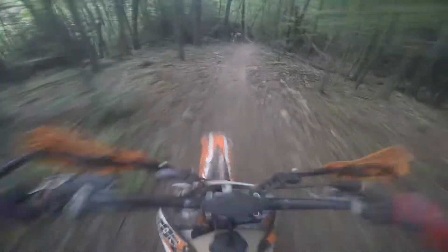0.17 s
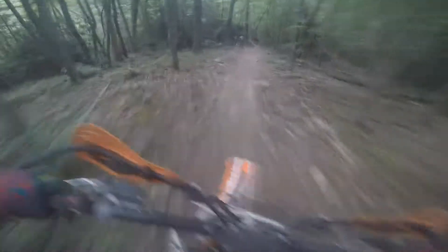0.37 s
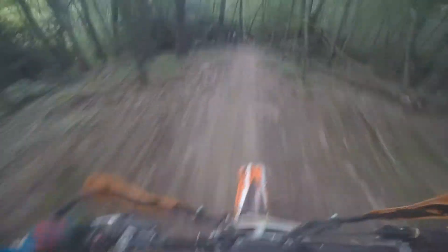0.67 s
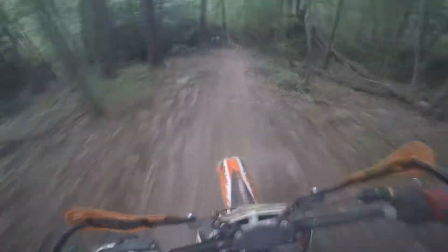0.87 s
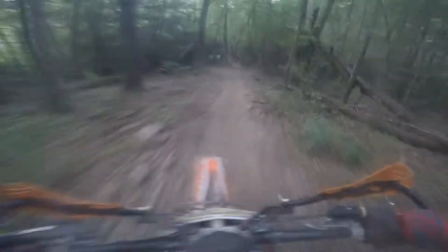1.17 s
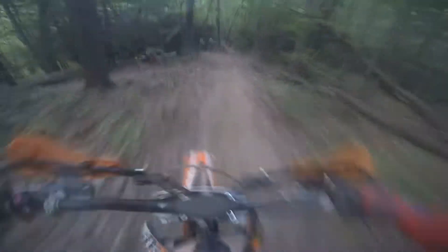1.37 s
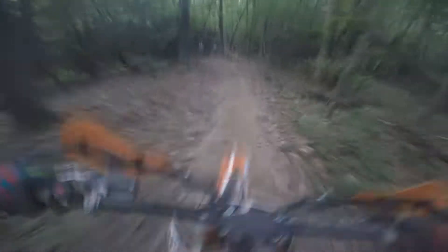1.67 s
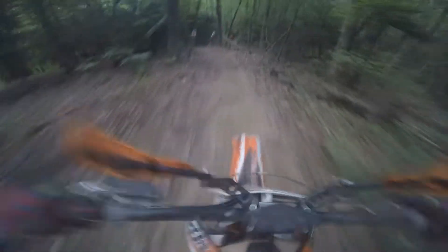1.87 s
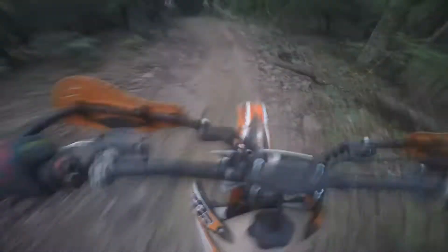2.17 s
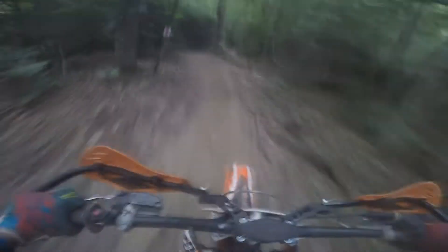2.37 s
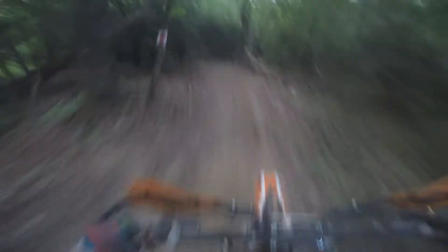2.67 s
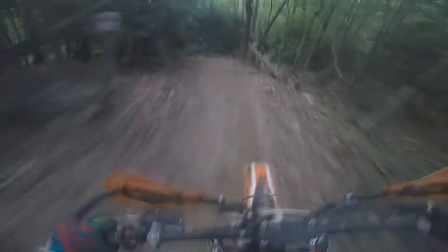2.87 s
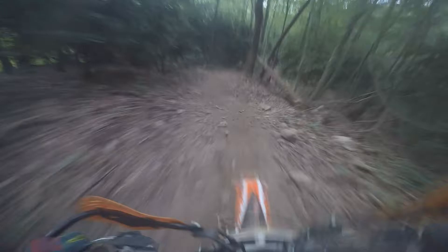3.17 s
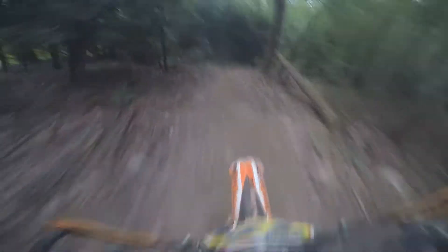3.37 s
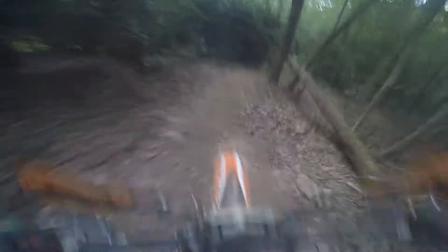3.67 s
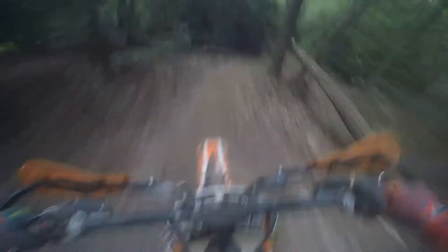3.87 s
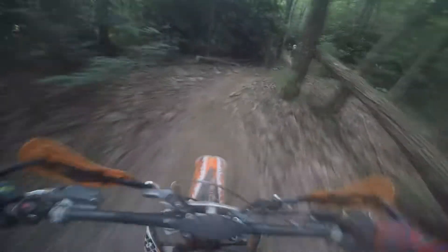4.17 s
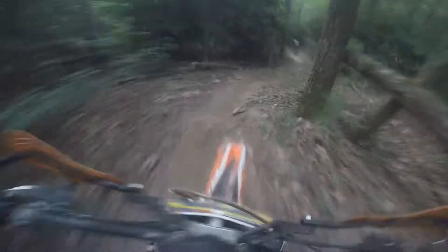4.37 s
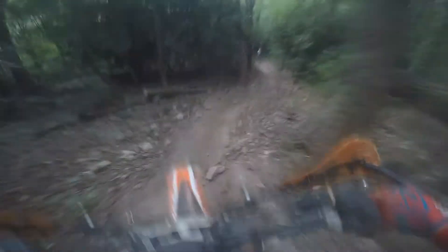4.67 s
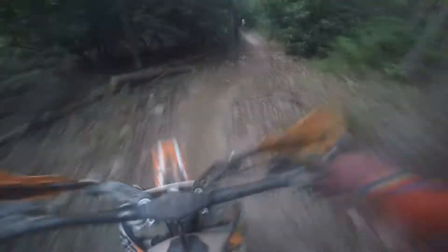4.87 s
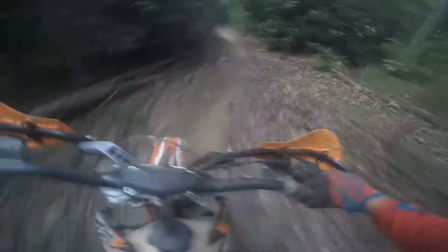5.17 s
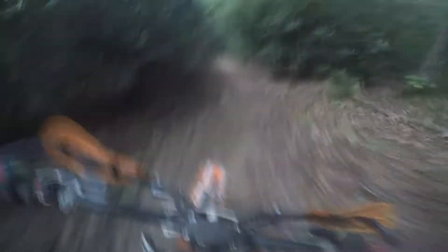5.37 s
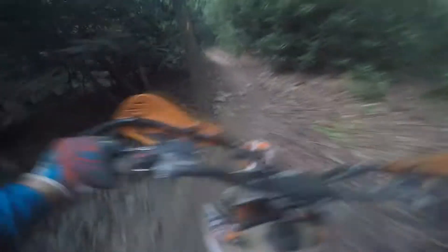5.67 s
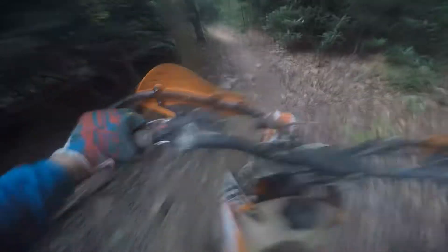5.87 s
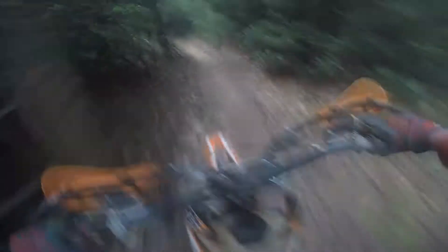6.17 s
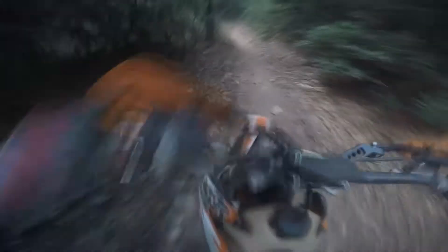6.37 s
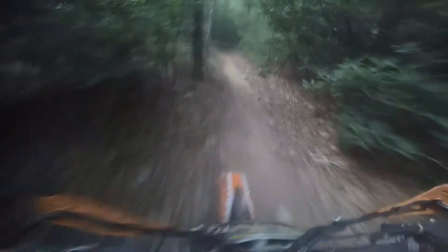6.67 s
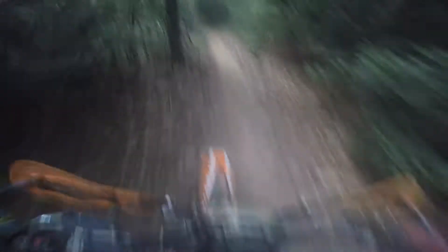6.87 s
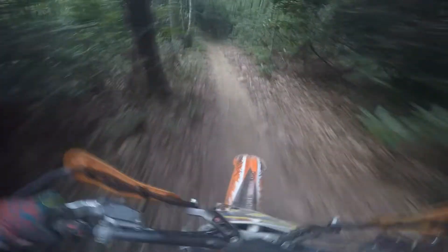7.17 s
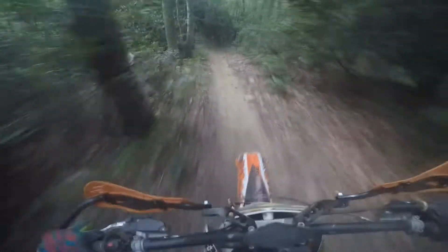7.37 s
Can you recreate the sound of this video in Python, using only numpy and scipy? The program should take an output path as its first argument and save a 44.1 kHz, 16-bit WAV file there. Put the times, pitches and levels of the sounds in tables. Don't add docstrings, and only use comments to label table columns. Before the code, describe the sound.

Close, muffled sound from a sealed helmet camera on a small dirt bike descending a forest trail. Roots and ruts make deep, ringing thumps while chain, buckle and stones rattle sharply. Engine clatter runs underneath; a short blip comes early, then a longer pull of quickening pops humming down. After one huge overloaded knock the engine nearly disappears, then blips again and settles.

```python
import sys
import numpy as np
from scipy import signal
from scipy.fft import rfft, irfft
from scipy.io import wavfile
from scipy.ndimage import uniform_filter1d

SR = 44100
rng = np.random.default_rng(int(sys.argv[2]) if len(sys.argv) > 2 else 0)


def output_pcm(signal):
    pcm = np.clip(np.atleast_2d(signal).T, -1, 1) * 32767
    wavfile.write(sys.argv[1], SR, np.round(pcm).astype(np.int16))


def decibels_to_gain(level_db):
    exponent = np.asarray(level_db, float) / 20
    return 10 ** exponent


N = 332514
T = np.arange(N) / SR


def evened(x):
    return x / np.sqrt(np.mean(x ** 2) + 1e-20)


def curve(rows):
    s, *columns = np.transpose(rows)
    return [np.interp(T, s, c) for c in columns]


def add(mix, s, sound):
    part = mix[int(s * SR):][:len(sound)]
    part += sound[:len(part)]


def pushes(s, size):
    track = np.zeros(N)
    np.add.at(track, np.minimum((np.asarray(s) * SR).astype(int), N - 1), size)
    return track


def drift(width):
    return evened(uniform_filter1d(uniform_filter1d(rng.standard_normal(N), width), width))


def filtered(x, order, hz, kind):
    return signal.sosfilt(signal.butter(order, hz, kind, fs=SR, output="sos"), x)


def coloured(x, points, tilt_db=0.):
    hz = np.fft.rfftfreq(len(x), 1 / SR) + 1
    f, db = np.transpose(points)
    gain_db = np.interp(np.log(hz), np.log(f), db) + tilt_db * np.log2(hz / 3000)
    return irfft(rfft(x) * decibels_to_gain(gain_db), len(x))


def burst(t, t60, rise):
    return decibels_to_gain(-60 * t / t60) * (1 - np.exp(-t / rise))


def ping(t, hz, t60, rise):
    return np.sin(2 * np.pi * hz * t) * burst(t, t60, rise)


def rung(x, hz, t60, rise):
    return signal.oaconvolve(x, ping(T[:int(1.2 * t60 * SR)], hz, t60, rise))[:N]


def snap(t, colour, hz, ring_db, t60, tilt_db=0):
    noise = evened(coloured(rng.standard_normal(len(t)), colour, tilt_db))
    ring = filtered(noise, 1, [hz * 0.905, hz * 1.0], "band")
    return evened(noise + decibels_to_gain(ring_db) * evened(ring)) * burst(t, t60, .002)


# (f/Hz, t60/s, rise/s)
RING, SWAY = (54., 0.98, 0.0044), (39.46, 0.4, 0.0083)
# (t/s, ring level/dB, helmet sway level/dB)
ROOT_KICKS = [(0.012, -43, -10.5), (0.105, -13.5, -7.5), (0.128, -15, -38), (0.413, -24, -20),
              (0.76, -13, -9.5), (0.919, -20.5, -8), (1.012, -19.5, -16.5), (1.086, -27, -6.5),
              (1.177, -11.5, -10), (1.302, -45, -11), (1.448, -47, 0), (2.074, -19.5, -7),
              (2.453, -17.5, -11.5), (2.524, -21, -11), (2.72, -6, 0), (2.783, -24, -8.5),
              (3.06, -24.5, -12), (3.614, -35, -15.5), (4.589, -8.5, -4.5), (4.655, -30, -6),
              (4.995, -8, 0.5), (5.032, -51, -6), (5.423, -10.5, -16), (6.075, -9.5, -7.5),
              (6.273, -7, -45), (6.308, -33, -10.5), (6.455, -45, -8.5), (6.772, -21, -10),
              (6.834, -15, -9), (6.965, -7.5, -45)]
# (t/s, ring level/dB, helmet sway level/dB)
RUT_DROPS = [(0.274, -6, -6), (0.311, -44, -8), (0.971, -35, -9.5), (1.231, -50, -9.5), (1.423, -7, -1),
             (1.631, -36, -4), (1.668, -15, -6), (1.873, -23, -11), (1.982, -14.5, -12), (2.021, -41, -2),
             (2.131, -43, -8.5), (3.136, -17, -46), (3.514, -9, -13), (3.768, -17.5, -47), (3.918, -35, -5),
             (3.962, -26, -7), (4.031, -43, -2.5), (4.087, -15, -28), (4.159, -17, -26), (4.269, -22, -14),
             (4.709, -16, -5), (5.728, -23, -15), (5.812, -17.5, -12.5), (6.033, -57, -10),
             (6.222, -10, -43), (6.495, -11.5, -45), (6.515, -9, -15), (6.608, -20.5, -45),
             (6.722, -11, -11), (7.483, -43, -11.5)]
# (t/s, direction +1 up or -1 down, ring level/dB, sway level/dB)
NUDGES = [
    (0.817, 1, -26, -11),
    (0.866, -1, -42, -11),
    (1.745, -1, -19.5, -17),
    (2.202, -1, -47, -12.5),
    (2.288, -1, -21, -26),
    (4.869, -1, -47, -15.5),
    (7.017, -1, -29, -17),
    (7.092, 1, -22.5, -19),
]
# (t before start/s, level/dB)
EARLIER_JOLT = [
    (0.016, -20),
    (0.024, -27.5),
]


def mount():
    kicks = [(s, 1, *db) for s, *db in ROOT_KICKS]
    drops = [(s, -1, *db) for s, *db in RUT_DROPS]
    s, way, ring_db, sway_db = np.transpose(kicks + drops + NUDGES)
    ring = rung(pushes(s, np.sign(way) * decibels_to_gain(ring_db)), *RING)
    sway = rung(pushes(s, np.sign(way) * decibels_to_gain(sway_db)), *SWAY)
    left = sum(decibels_to_gain(db) * ping(T + lead, *mode) for (lead, db), mode in zip(EARLIER_JOLT, (RING, SWAY)))
    return left + ring - sway


# (t/s, level/dB, f/Hz, thud level in the case/dB)
KNOCKS = [(0.121, -4, 97.5, -33.5), (0.277, -9, 98, -36), (0.769, 4.5, 90.3, -39), (0.923, -6.5, 92, -34),
          (0.979, -6, 95.4, -31), (1.09, -6, 92.4, -42), (1.305, -5, 94, -36), (1.421, 0, 86, -27),
          (1.626, -8.5, 103, -32.5), (2.004, 0, 106.2, -27), (2.018, 8.5, 93, -25), (2.044, 0.5, 83, -29),
          (2.443, -6, 111, -66), (2.725, 5, 88.7, -22), (3.506, 3, 94.6, -41), (3.538, -7, 85, -35),
          (3.757, -7, 88.5, -50), (4.003, 5.5, 93.7, -45), (4.049, -2.5, 103, -45), (4.229, -7, 87.6, -38),
          (4.59, -3.5, 111, -26), (4.705, -5, 91, -46), (5.003, 9.5, 82, -16.5), (5.433, -1, 98.3, -36.5),
          (6.071, -1, 97, -29), (6.222, -10, 104, -28.5), (6.503, 2.5, 111, -49),
          (6.723, -7.5, 109.5, -36.5), (6.969, -2, 87.3, -37), (7.444, -7, 97.5, -30)]
# (t/s, level/dB, f/Hz)
TAPS = [(0.146, -15, 94), (0.421, -13, 108), (0.55, -12.5, 113), (0.592, -14, 121), (1.017, -15, 89),
        (1.168, -6, 97), (1.448, -5, 103), (1.671, -12, 90), (1.743, -15, 104), (1.846, -13, 104),
        (2.143, -14.5, 115), (2.234, -16.5, 112), (2.371, -17, 103), (2.429, -6, 77), (2.537, -11, 90.5),
        (2.863, -23, 119), (3.055, -12.5, 97), (3.139, -20, 83), (3.34, -23, 111), (3.909, -6.5, 96),
        (4.373, -9.5, 82), (4.649, -11, 101), (4.728, -7, 106), (4.845, -12.5, 110), (5.329, -38, 113),
        (5.613, -10.5, 88), (5.673, -13, 90), (5.831, -13, 103), (6.158, -12.5, 105), (6.286, -7.5, 114),
        (6.455, -10, 120), (6.543, -9.5, 109.6), (6.783, -11.5, 93), (7.072, -11.5, 89)]
# (t/s, peak level/dB, f/Hz)
STONE_CRACKS = [(0.424, -33, 2100), (1.434, -28, 574), (1.622, -28.5, 1210), (1.779, -23.5, 2100),
                (2.002, -24.5, 494), (2.027, -19.5, 580), (2.017, -21.5, 1170), (2.048, -29, 2870),
                (2.729, -30.5, 1110), (5.004, -26, 1040), (2.727, -22, 466), (3.115, -27.5, 2380),
                (3.344, -31, 535), (3.627, -36, 1770), (4.592, -25.5, 2200), (5.003, -19.5, 550),
                (5.003, -26, 1394), (5.013, -24, 5300), (5.079, -32.5, 2450), (5.318, -44, 676),
                (5.427, -34, 565), (5.607, -35, 1260), (5.611, -36.5, 2200), (6.075, -26.5, 1220),
                (6.224, -31.5, 1210), (6.225, -28, 2250), (6.555, -27.5, 1920), (6.848, -34, 574),
                (7.195, -40, 720), (7.314, -37, 644), (7.446, -34, 640)]
# (f/Hz, level/dB)
CRACK_COLOUR = [(100., -32), (300., 7), (600., -4), (1300., -2.5), (2500., -5), (8000., -36)]


def frame():
    thud_mode, thud_lag_s = (252.3, 0.075, 0.0035), 0.0031
    tap_thud_db = -29.5
    out, t = np.zeros(N), T[:8000]
    for s, db, hz, *_ in KNOCKS + TAPS:
        add(out, s, decibels_to_gain(db) * ping(t, hz, t60=0.11, rise=0.014))
    thuds = [(s, thud_db) for s, _, _, thud_db in KNOCKS] + [(s, db + tap_thud_db) for s, db, _ in TAPS]
    s, db = np.transpose(thuds)
    out += rung(pushes(s + thud_lag_s, decibels_to_gain(db + 6.0)), *thud_mode)
    for s, db, hz in STONE_CRACKS:
        grind = decibels_to_gain(2.5) * snap(t, CRACK_COLOUR, hz, -5, .045)
        note = decibels_to_gain(5) * ping(t, hz, .024, .001)
        add(out, s, decibels_to_gain(db - 3.) * (grind + note))
    return out


# (rms level/dB into ring, sway, nod, knock)
SHAKE_DB = [-41, -41, -36, -50]


def shake():
    nod, knock = (29.3, 0.82, 0.004), (116.5, 0.19, 0.016)
    bumps = (rng.random(N) < 70 / SR) * rng.uniform(-0.39, 1, N) * decibels_to_gain(0.56 * drift(3000))
    modes = (RING, SWAY, nod, knock)
    return sum(decibels_to_gain(db) * evened(rung(bumps, *mode)) for db, mode in zip(SHAKE_DB, modes))


# (f/Hz, level/dB)
RATTLE_COLOUR = [(350, -30), (600, -15.5), (1470, -9.5), (1830, -4.5), (3660, -7), (4090, -1.5), (5080, -4),
                 (5980, -7.5), (6850, -11.5), (7540, -17), (13700, -32.5), (15500, -31)]
# (t/s, peak level/dB)
CHAIN_SNAPS = [(0.8445, -30.5), (1.5773, -17.5), (1.6187, -23), (1.677, -24), (1.8327, -20), (1.9866, -27),
               (2.379, -29), (2.5611, -22.5), (3.037, -29.5), (3.1181, -20.5), (3.2415, -22.5),
               (3.461, -27), (3.623, -22), (3.8476, -38), (3.99, -29), (4.5272, -18.5), (4.5935, -30),
               (4.6328, -26), (4.7648, -19), (5.0107, -21.5), (6.224, -37.5), (6.3173, -26),
               (6.5056, -22.5), (6.5525, -25), (6.6005, -24), (7.4799, -24.5)]
# (t/s, peak level/dB)
BUCKLE_SNAPS = [(0.2715, -27), (0.4217, -21.5), (1.001, -22.5), (1.066, -23.5), (1.1324, -27), (1.429, -27),
                (1.7812, -17), (1.938, -28), (2.0144, -18.5), (2.1072, -22.5), (2.348, -25.5),
                (2.581, -18.5), (2.6652, -16), (3.176, -26), (3.3419, -23.5), (3.4009, -23), (5.14, -37),
                (5.167, -45), (5.322, -35.5), (5.338, -34), (5.55, -38), (5.585, -35), (5.8136, -26.5),
                (6.636, -28), (6.6937, -26), (6.732, -21.5), (6.9177, -24.5)]


def rattles():
    note_spread = 0.15
    spread_db = 3.
    out, t = np.zeros(N), T[:4096]
    for rows, note_hz in ((CHAIN_SNAPS, 3380), (BUCKLE_SNAPS, 3680)):
        for s, db in rows:
            lag, share, off, tilt = rng.uniform([.008, .3, -1.2, -.8], [.016, 1.1, 2.2, .5])
            hz = note_hz * (1 + note_spread * off)
            first = snap(t, RATTLE_COLOUR, hz, -7, .032, spread_db * tilt)
            rebound = snap(t, RATTLE_COLOUR, hz * rng.uniform(.8, 1.2), -7, .045, -spread_db)
            add(out, s, decibels_to_gain(db - 1.5) * first)
            add(out, s + lag, share * decibels_to_gain(db - 8) * rebound)
    return out


# (t/s, peak level/dB, sheen level/dB)
BRIGHT_TICKS = [(0.2713, -33, -27), (0.3112, -30, -27), (0.4224, -35, -25), (0.6563, -34, -19),
                (0.8599, -33, -25), (0.9547, -33, -22), (1.002, -34, -20), (1.068, -43, -27),
                (1.1333, -25, -29), (1.4287, -30, -20), (1.5787, -33, -19), (1.6177, -42, -25),
                (1.6581, -36, -26), (1.734, -25.5, -28), (1.7836, -33, -22), (1.8317, -36, -24),
                (1.85, -23, -26), (1.9874, -43, -14), (2.0136, -19, -28), (2.0692, -32, -21),
                (2.108, -32, -31), (2.288, -36, -22), (2.3275, -30, -28), (2.378, -38, -32),
                (2.56, -36, -13), (2.582, -20, -21), (2.6675, -22, -22), (2.933, -39, -17),
                (3.0365, -39, -23), (3.1175, -37, -18), (3.174, -28, -29), (3.239, -40, -24),
                (3.2545, -31, -27), (3.339, -26, -22), (3.3996, -28, -24), (3.463, -44, -16),
                (3.6227, -42, -22), (3.8312, -43, -20), (3.895, -36, -17), (3.9883, -38, -21),
                (4.0713, -30, -19), (4.5266, -34, -28), (4.5945, -44, -27), (4.775, -24, -24),
                (5.0115, -41, -26), (5.8117, -40, -24), (6.3195, -40, -28), (6.507, -37, -25),
                (6.6363, -35, -28), (6.6723, -27, -23), (6.6927, -38, -21), (6.7376, -33, -20),
                (6.8823, -39, -19), (6.9182, -37, -19), (6.9651, -33, -23), (6.998, -33, -29),
                (7.1387, -32, -16), (7.415, -32, -30), (7.4799, -39, -20), (7.5193, -39, -17)]


def ticks():
    out, t = np.zeros(N), T[:2048]
    fall = burst(t, 0.028, .0006)
    for s, db, sheen_db in BRIGHT_TICKS:
        low, high = rng.standard_normal((2, len(t)))
        dry_burst = evened(filtered(low, 2, [4800., 9000.], "band"))
        sheen = evened(filtered(high, 3, 9500., "high"))
        add(out, s, decibels_to_gain(db - 11.5) * fall * (dry_burst + decibels_to_gain(sheen_db + 5) * sheen))
    return out


# (t/s, peak level/dB)
FLICKS = [(0.066, -26), (0.1032, -43), (0.1426, -26.5), (0.181, -25), (0.2134, -33), (0.2344, -28),
          (0.2538, -25), (0.5122, -32), (0.617, -36), (0.6927, -28.5), (0.715, -30), (0.811, -30),
          (1.16, -23), (1.275, -35), (1.3678, -37), (1.398, -25.5), (1.5054, -29), (1.5504, -35),
          (1.592, -23), (2.2014, -33), (2.2735, -29), (2.4577, -31), (2.6024, -28), (2.6774, -20),
          (2.7174, -20.5), (2.9424, -27.5), (2.9614, -30.5), (3.1265, -21), (3.1535, -25), (3.3503, -21.5),
          (3.3802, -22), (3.4464, -43), (3.5199, -43), (3.5484, -29), (3.753, -30.5), (3.8317, -30),
          (3.894, -24.5), (3.9294, -26), (3.9459, -30), (4.0123, -22), (4.036, -25), (4.1114, -19),
          (4.3261, -29), (4.716, -28), (4.9671, -29), (6.1906, -29), (6.344, -26), (6.4757, -35),
          (6.5256, -32), (7.2414, -35), (7.3148, -32), (7.3913, -28)]


def flicks():
    out, t = np.zeros(N), T[:2048]
    for s, db in FLICKS:
        hz, tilt_db = rng.uniform(2500, 5500), rng.uniform(-1.5, 1.5)
        add(out, s, decibels_to_gain(db - 5.5) * snap(t, RATTLE_COLOUR, hz, -5, 0.041, tilt_db))
    return out


# (t/s, hum level/dB, time until gone/s)
SHUTS = [
    (4.11, -37.5, .9),
    (5.65, -53, .25),
    (6.59, -47, .85),
]
HUM_FLOOR_DB = -60


def overrun_db():
    level_db = HUM_FLOOR_DB
    for s, db, length_s in SHUTS:
        rise = np.clip((T - s) / .06, 0, 1)
        sink = np.clip(1 - ((T - s) / length_s) ** 2, 0, 1)
        level_db = level_db + (db - HUM_FLOOR_DB) * rise * sink
    return level_db


# (t/s, firing rate f/Hz, exhaust level/dB)
BLIPS = [
    [(2.16, 52, -52), (2.27, 52, -53)],
    [(6.3, 23, -49), (6.32, 20, -48)],
    [(3.727, 23, -53), (3.75, 20, -50)],
    [(6.368, 14, -49), (6.39, 20, -47)],
    [(2.42, 32, -58), (2.55, 57, -45.5), (2.68, 37, -64), (2.72, 56, -74)],
    [(3.762, 15.4, -36.5), (3.85, 32.5, -37.5), (3.93, 42, -43), (3.99, 63, -39), (4.03, 86, -41.5),
     (4.084, 98, -40), (4.11, 115, -42), (4.116, 42, -44), (4.15, 42, -39)],
    [(5.46, 32, -57), (5.52, 58, -51), (5.57, 58, -59)],
    [(6.425, 31, -41), (6.49, 39, -38), (6.53, 60, -43.5), (6.575, 107, -52), (6.61, 36, -52)],
]
# (t/s, level/dB)
ROAR_SWELL = [(0, 1), (.4, -0.5), (.9, 0.5), (1.5, 2), (2.2, 0), (2.6, -0.5), (2.95, -1), (3.3, 3),
              (3.7, 3.5), (4.2, 0), (4.6, 3.5), (4.9, 2), (5.3, 0.5), (5.7, 8), (6.1, 5), (6.5, 1),
              (7.1, 4), (7.54, -1.5)]


def roaring_db():
    settle_s = 0.25
    blows = pushes([row[0] for row in KNOCKS + TAPS], 0.38)
    shaken = signal.lfilter([1], [1, -np.exp(-1 / (settle_s * SR))], blows)
    open_throttle = sum(1. * (T > rows[0][0]) * (T < rows[-1][0]) for rows in BLIPS)
    load = uniform_filter1d(open_throttle, size=2000)
    loss_db = 0.56 * (overrun_db() - HUM_FLOOR_DB)
    return 2 + curve(ROAR_SWELL)[0] + 3 * np.tanh(shaken) + 2 * load - loss_db


def wandering(x, hz, width):
    turn = np.exp(2j * np.pi * np.cumsum(hz * (1 + 0.032 * drift(5000))) / SR)
    r, soft = np.exp(-np.pi * np.array([width, 400]) / SR)
    return (turn * signal.lfilter([1], np.convolve([1, -r], [1, -soft]), x / turn)).real


# (f/Hz, width/Hz, level/dB)
CASE_RINGS = [(1290, 90, -1), (1800, 100, -1), (2050, 120, -6), (2770, 130, 0), (3000, 130, 0),
              (4030, 220, -4), (5050, 260, -6)]


def case_rings(turns):
    grains = (rng.random((len(CASE_RINGS), N)) < 160 / SR) * rng.uniform(-1, 1, N)
    slap_db = -14 + 0.64 * (overrun_db() - HUM_FLOOR_DB) + 1.3 * rng.standard_normal(N)
    slap = np.diff(np.floor(turns), prepend=0) * decibels_to_gain(slap_db)
    lift = np.sqrt(1 + uniform_filter1d(slap ** 2, size=4000) / np.mean(grains ** 2))
    struck = (grains + slap) / lift
    rings = np.zeros(N)
    for x, (hz, width, db) in zip(struck, CASE_RINGS):
        rings += decibels_to_gain(db + 1.5 * drift(6000)) * evened(wandering(x, hz, width))
    return evened(rings)


# (t/s, clatter level/dB)
CLATTER = [(0, -39), (1.0, -38), (1.85, -37.5), (2.2, -41), (2.72, -36), (2.85, -44), (3.35, -41),
           (3.75, -41), (3.98, -34), (4.065, -25), (4.3, -30.5), (4.95, -36), (5.22, -49), (5.95, -43),
           (6.4, -37.5), (6.55, -34.5), (6.8, -36.5), (7.54, -38)]
# (f/Hz, level/dB)
CASE_COLOUR = [(88, 16), (150, -7), (225, -1.5), (263, -2.5), (453, -10), (550, -6.5), (877, -3),
               (1240, -7.5), (1870, -3), (2310, -6.5), (2980, -4.5), (3550, -8), (4060, -10.5), (5650, -19),
               (15500, -49)]


def clatter(turns):
    level_db = curve(CLATTER)[0]
    fizz_db = 0.26 * (level_db + 54.5)
    gate = 1 + 0.028 * np.cos(2 * np.pi * turns)
    strays = (rng.random(N) < 70 / SR) * decibels_to_gain(8.1 * np.minimum(rng.exponential(1, N), .9))
    strays = signal.oaconvolve(strays, burst(T[:2000], 0.056, 0.009))[:N]
    flicker = decibels_to_gain(2.06 * drift(250))
    metal = coloured(rng.standard_normal(N) * gate * (1 + 0.23 * strays) * flicker, CASE_COLOUR)
    roar = filtered(metal, 2, 850., "low")
    fizz = filtered(metal, 2, 4500., "high")
    body = metal + (decibels_to_gain(roaring_db()) - 1) * roar + (decibels_to_gain(fizz_db) - 1) * fizz
    body = body / np.std(metal - roar)
    ring_db = -6. + 0.095 * (level_db + 39)
    return decibels_to_gain(level_db - 2.5) * (body + decibels_to_gain(ring_db) * case_rings(turns))


def firings(rows):
    rate_hz, db = curve(rows)
    on = (T >= rows[0][0]) & (T < rows[-1][0])
    uneven = 1 + .07 * drift(400) * (rate_hz > 50)
    cycles = np.cumsum(rate_hz * on * uneven) / SR
    fired = np.diff(np.floor(cycles + .99), prepend=0)
    pops = fired * on * decibels_to_gain(db + 1.5 * rng.standard_normal(N))
    return np.array([pops, pops * decibels_to_gain(8.5 * np.log2(rate_hz / 58))])


# (f/Hz, width/Hz, level/dB)
PIPE_TONES = [(258, 48, 0), (400, 150, -4), (545, 125, -1), (720, 140, -7)]


def exhaust():
    pops, bright = sum(firings(rows) for rows in BLIPS)
    tones = np.zeros(N)
    for k, (hz, width, db) in enumerate(PIPE_TONES):
        blow = bright * decibels_to_gain(3 * rng.standard_normal(N) - 1) if hz > 300 else pops
        tones += (-1) ** k * decibels_to_gain(db) * rung(blow, hz, 2.2 / width, .005)
    hiss = evened(coloured(rng.standard_normal(N), RATTLE_COLOUR))
    puff = signal.oaconvolve(bright, decibels_to_gain(-60 * T[:1500] / 0.094))[:N] * hiss
    tap = rung(pops, hz=2900, t60=0.035, rise=.001)
    return decibels_to_gain(24.5) * (tones + decibels_to_gain(-31.0) * puff + decibels_to_gain(-16.5) * tap)


# (f/Hz, level/dB)
HUM_COLOUR = [(120, -4), (180, -1), (300, -3), (600, 1), (870, -9), (1250, 0), (1900, -1), (2300, -9),
              (2950, -2), (3600, -14)]


def hum(turns):
    waver = [decibels_to_gain(3.5 * drift(1600)) for _ in range(5)]
    stack = np.zeros(N)
    for k in range(2, 40):
        order = np.cos(2 * np.pi * (k * turns + rng.random()))
        stack += waver[k % 5] * (1 - .3 * (k % 2)) * order
    return decibels_to_gain(overrun_db()) * evened(coloured(stack, HUM_COLOUR))


# (t/s, f/Hz)
REVS = [(0, 62), (2.4, 58), (2.7, 75), (3.7, 47), (4.0, 62), (4.084, 90), (4.146, 99), (4.47, 78.8),
        (4.6, 71.8), (5.0, 68), (5.75, 49), (6.4, 56), (6.5, 70), (6.6, 98), (6.73, 86.7), (6.96, 73.4),
        (7.3, 60), (7.54, 58)]


def engine():
    turns = np.cumsum(curve(REVS)[0]) / SR
    sound = clatter(turns) + hum(turns) + exhaust()
    dip_hz, sharpness, depth = 841, 3.45, 0.66
    return sound - depth * signal.lfilter(*signal.iirpeak(dip_hz, sharpness, SR), sound)


def grit():
    out = np.zeros(N)
    for hz in (3500, 5000, 7000, 9500):
        thrown = rng.random(N) < 35 / SR * decibels_to_gain(4 * drift(6000))
        hits = thrown * decibels_to_gain(4 * np.minimum(rng.exponential(1, N), 2))
        hits = signal.oaconvolve(hits, burst(T[:800], .016, .0007))[:N]
        out += filtered(hits * rng.standard_normal(N), 1, [.7 * hz, 1.4 * hz], "band")
    return decibels_to_gain(curve(CLATTER)[0] - 19.5) * evened(coloured(out, RATTLE_COLOUR, 0.87))


def air():
    hiss = evened(filtered(rng.standard_normal(N), 4, 10500., "high"))
    pace_db = 0.71 * (curve(CLATTER)[0] + 43)
    return decibels_to_gain(-72 + pace_db + 4 * drift(700)) * hiss


def scene():
    blows = mount() + frame() + shake()
    loose = rattles() + ticks() + flicks()
    return (blows + loose + engine() + grit() + air())[None]


def roll_off(x):
    return signal.sosfilt(signal.butter(12, 16330, fs=SR, output="sos"), x)


def record(dry):
    top, knee = .96, 5.
    held = dry / (1 + abs(dry / top) ** knee) ** (1 / knee)
    held = signal.oaconvolve(held, signal.firwin(127, 15050, fs=SR)[None], "same")
    return roll_off(held)


dry = scene()
out = record(dry)
output_pcm(out)
```